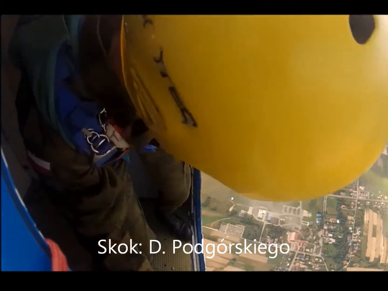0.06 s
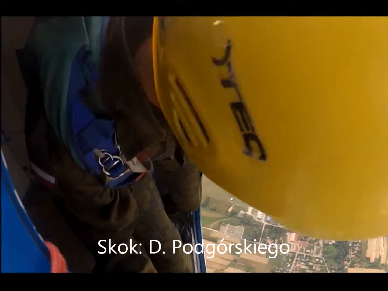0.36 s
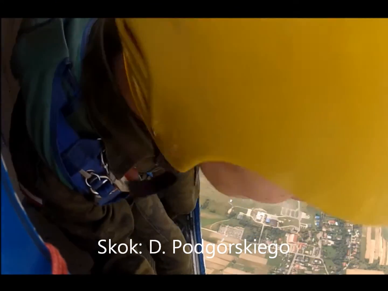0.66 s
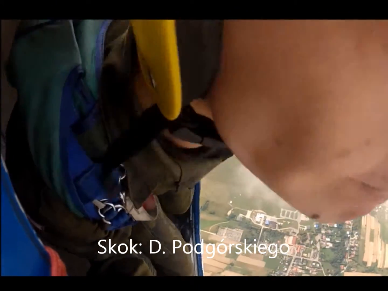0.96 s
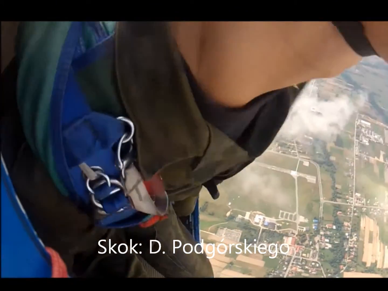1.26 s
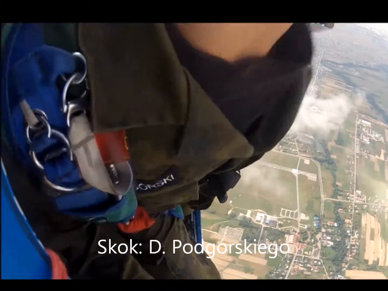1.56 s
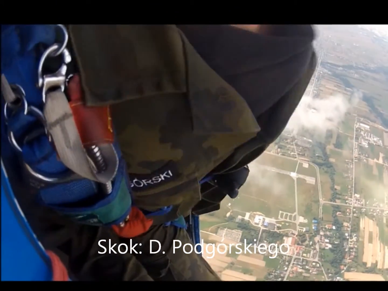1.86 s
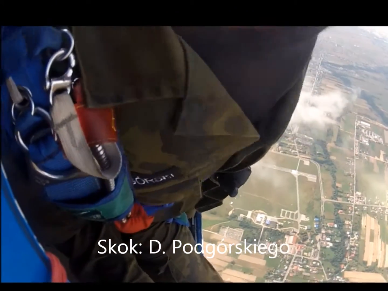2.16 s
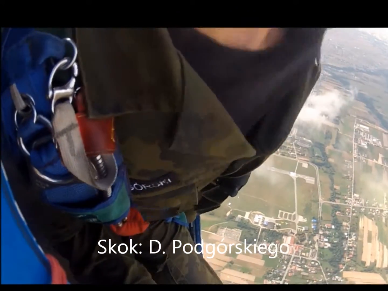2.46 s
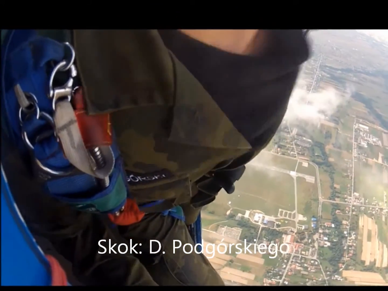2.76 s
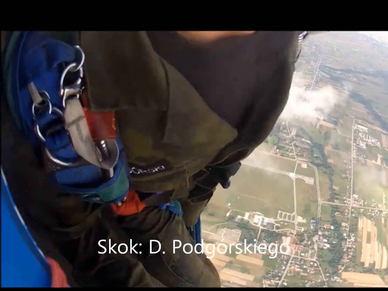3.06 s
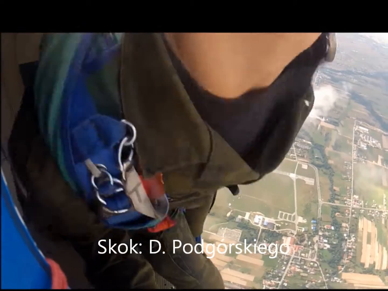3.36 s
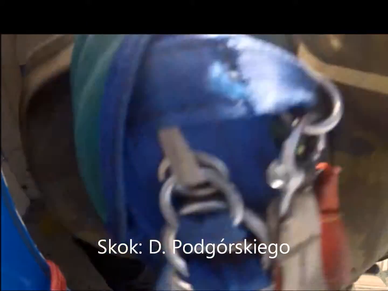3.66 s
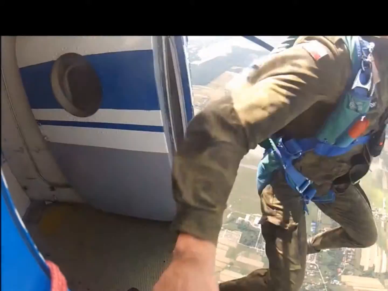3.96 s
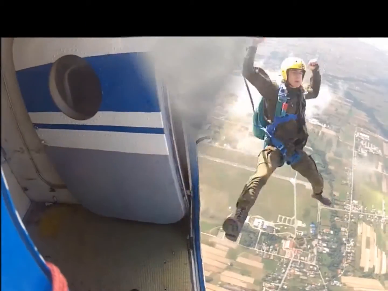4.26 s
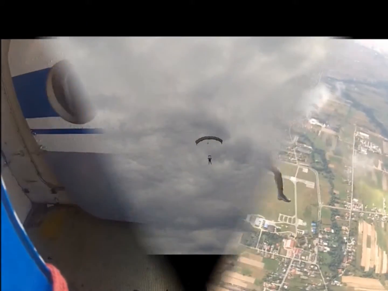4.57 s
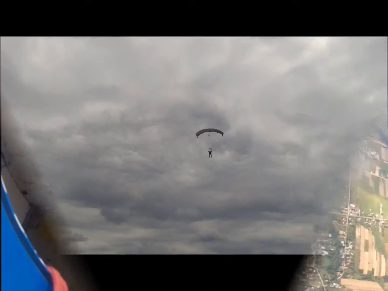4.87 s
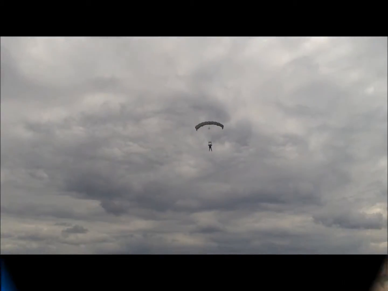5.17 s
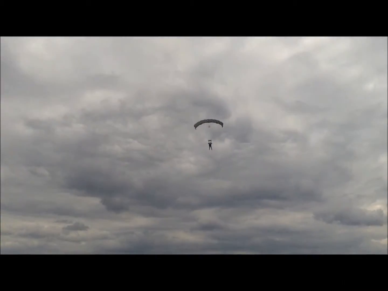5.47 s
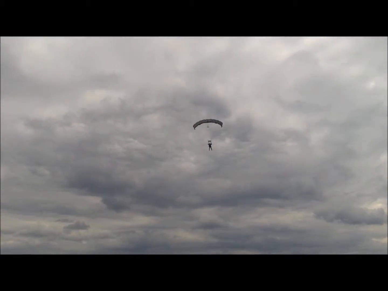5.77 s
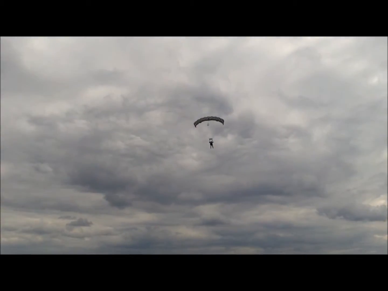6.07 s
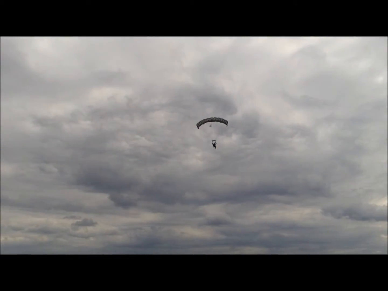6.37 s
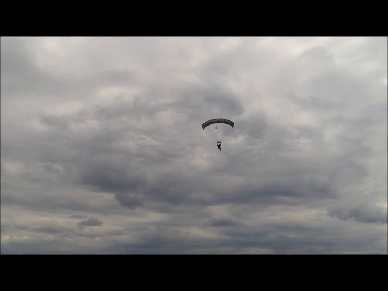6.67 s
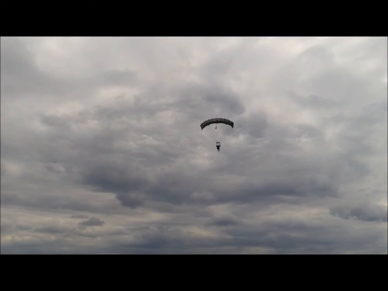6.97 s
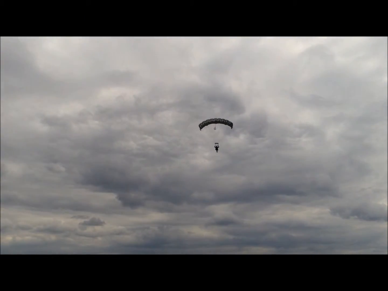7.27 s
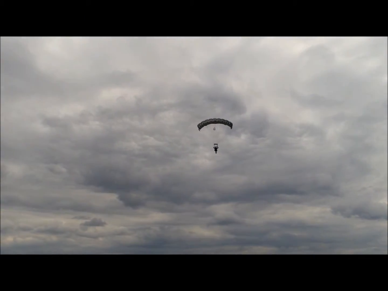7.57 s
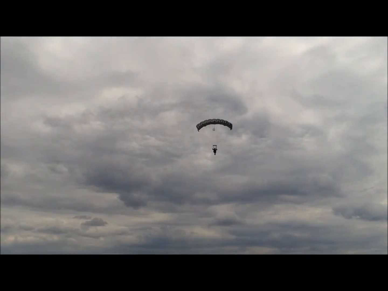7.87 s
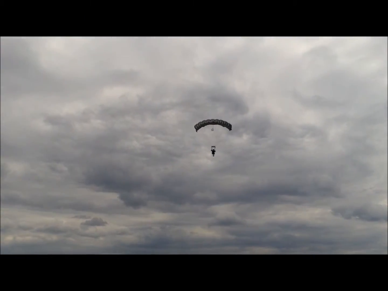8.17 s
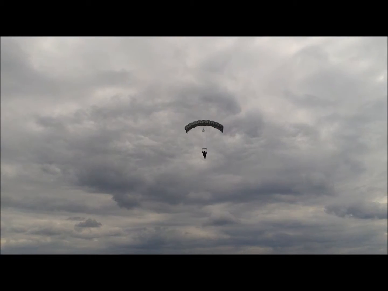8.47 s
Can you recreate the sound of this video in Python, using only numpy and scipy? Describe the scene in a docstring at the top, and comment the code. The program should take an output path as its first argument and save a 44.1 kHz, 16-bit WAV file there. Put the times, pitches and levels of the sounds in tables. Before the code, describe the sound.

Loud wind roars over a microphone at a plane's open door, then fades into a quiet field with a distant plane drone.

```python
"""From jump plane to quiet field

Slipstream roars over a camera microphone in the open door of a jump plane: eddies thump, rasp and fizz
on the housing, air swishes off the jumper's suit and the propeller throbs underneath.
The roar fades into a quiet field under a parachute, where the plane drones far off,
a breeze brushes the microphone and the plastic camera ticks a few times in the hand."""
import sys
import numpy as np
from scipy.fft import rfft, irfft, next_fast_len
from scipy.io import wavfile
from scipy.ndimage import map_coordinates

SR = 44100
rng = np.random.default_rng(int(sys.argv[2]) if len(sys.argv) > 2 else 0)


def generate_wav(signal):
    """Clip the signal to [-1, 1] and save it as 16-bit WAV at the path in sys.argv[1]."""
    frames = np.transpose(np.atleast_2d(signal))
    scaled = np.clip(frames, -1, 1) * 32767
    pcm = np.round(scaled).astype(np.int16)
    wavfile.write(sys.argv[1], SR, pcm)


N = 380132
TIME = np.arange(N) / SR
# the door's roar fades in a straight line of gain and is cut just short of silence
FADE_START_S, FADE_ZERO_S, CUT_S = 2.08, 5.374, 5.34

# partials of the far plane: f/Hz, level/dB
DRONE_PARTIALS = [(91, -45), (115.8, -54), (182, -59.5), (215, -61), (231, -64.5), (272.5, -62.5),
                  (330, -65.5), (347, -67.5), (363.7, -63.5), (379, -73), (429.7, -73.5), (454.7, -67),
                  (463, -68.5), (527.6, -80.5), (561, -71), (676, -74), (816.5, -76.5)]
# colour of the far rush of air: f/Hz, level/dB
FAR_AIR_SPECTRUM = [(100, 0), (330, 0.5), (410, -4.5), (580, 1.5), (800, -4), (960, -10), (1250, -4),
                    (1550, -12), (1800, -14.5), (2500, -21), (3300, -30), (4200, -56), (15000, -61)]
# swells of that rush: t/s, half width/s, relative level/dB
FAR_AIR_SWELLS = [(5.82, 0.42, -64), (6.68, .25, -67.5), (7.25, .25, -60.5), (7.49, .13, -57),
                  (7.8, .2, -64.5)]
# faint high rustles: t/s, half width/s, level/dB
RUSTLE_SWELLS = [(7.845, .015, -80), (8.25, .06, -79), (8.52, .11, -78)]
# colour of the rustles: f/Hz, level/dB
RUSTLE_SPECTRUM = [(3000, -2), (4500, -6), (7500, 2), (9500, -9), (11000, -23.5), (14000, -30.5)]
# puffs of breeze: t/s, half width/s, flutter level/dB, rumble level/dB
BREEZE_PUFFS = [(5.48, 0.041, -60, -45), (5.77, .07, -39, -36), (6.11, .05, -47, -49),
                (6.27, 0.031, -48, -41), (6.68, .04, -50, -41), (6.84, 0.027, -50, -58),
                (6.99, .03, -61.5, -44), (7.36, .1, -52, -49), (7.78, 0.064, -45, -47),
                (8.16, 0.14, -52, -41), (8.5, 0.12, -55, -43)]
# colours of the breeze's flutter and rumble on the microphone: f/Hz, level/dB
FLUTTER_SPECTRUM = [(40, -14.5), (135, 1.5), (190, -4.5), (260, -11), (400, -28), (900, -38.5), (2000, -82),
                    (5000, -120)]
RUMBLE_SPECTRUM = [(5, -3.5), (20, 0.5), (45, 3.5), (70, -3), (110, -18.5), (200, -36), (400, -58),
                   (1000, -75), (4000, -120)]
# ticks of the camera body: t/s, relative level/dB, ring f/Hz
CAMERA_TICKS = [(6.131, -32.5, 2630), (7.2667, -26.5, 3020), (7.3257, -27, 3140), (8.33, -35, 7150)]
# modes of the plastic case: f/Hz, level/dB, t60/s
CASE_MODES = [(4030, -8, 0.0027), (6200, -4, .0025), (8200, -5, 0.0019), (10800, -9, .002),
              (13500, -16, .002)]
# propeller and cabin tones: f/Hz, relative level/dB, pitch wander/Hz
PROPELLER_TONES = [(31.9, -4.5, 0.92), (63.2, -5, 0.87), (76.8, -5.5, 2.2), (344.5, -23, 0.99),
                   (667, -26.5, 3)]
# fader ride on the propeller, heard from the door: t/s, level/dB
THROB_LEVELS = [(0.0, -8.5), (0.52, -23.0), (0.6, -11.5), (0.76, -24.5), (1.0, -12.5), (1.56, -12.5),
                (1.68, -17), (2.08, -13), (2.48, -15.5), (2.64, -9), (2.8, -15.5), (2.92, -10),
                (4.04, -18.5), (4.36, -20), (4.52, -11.5), (5.0, -17)]
# the jumper leans out, then leaves: start t/s, end t/s, level/dB
SUIT_SWISHES = [(0.522, 1.09, -25.5), (3.522, 3.67, -24), (3.633, 3.883, -26.5)]
# colour of air glancing off the suit: f/Hz, level/dB
SUIT_SPECTRUM = [(1200, -33.5), (2200, -3.5), (2900, 7), (3900, -16.5), (5300, -8.5), (6100, -15),
                 (7000, -13), (10000, -14.5), (15000, -28.5)]
# sharp slaps of air: t/s, level/dB, ring f/Hz
AIR_SLAPS = [(.977, -9.5, 1780), (1.9332, -6.5, 1500), (1.9353, -4, 1380), (2.216, -7.5, 1350),
             (2.219, -3.5, 1307), (2.342, -7.5, 2320)]
# cavities of the camera housing: f/Hz, width/Hz, gain/dB
HOUSING_CAVITIES = [(705, 95, 9), (990, 80, 5), (1228, 170, 5), (1744, 180, 7.5), (2130, 200, -1.5),
                    (2400, 430, 4), (2830, 120, -3), (3110, 150, 5.5), (3650, 350, 4.5), (6654, 410, 2.5),
                    (8320, 240, 7), (8890, 200, 6), (9600, 300, 6), (10240, 290, 7), (13700, 240, 7.5),
                    (15100, 220, 5.5)]
# colours of the slipstream's low buffet, mid rush and top fizz: f/Hz, level/dB
BUFFET_SPECTRUM = [(8, -22.5), (18, -12.5), (27, 3.5), (45, -5.5), (75, 2.5), (105, 0), (220, -2),
                   (330, -5.5), (450, -11.5), (600, -20.5), (1000, -32), (3000, -81)]
RUSH_SPECTRUM = [(150, -44.5), (500, -7.5), (850, -6.5), (1150, -1), (1900, 0), (2600, -5.5), (3600, -9.5),
                 (4400, -16), (5300, -17), (6000, -28), (6600, -22), (8000, -28.5), (11000, -45)]
FIZZ_SPECTRUM = [(3000, -52.5), (6100, -24), (7000, -6.5), (7800, -5), (8500, -2), (10300, 0.5),
                 (10900, -1.5), (11300, -10), (12800, -7.5), (13400, -3), (14400, 1), (15300, -7)]
# the strongest gusts, and brief drawn-in dips, deepest where the camera's gain control
# ducks after a hard slap: t/s, half width/s, gain/dB
GUSTS_AND_DUCKS = [(.62, .04, 1.5), (.975, 0.0059, 2), (1.15, 0.026, 1.5), (1.48, 0.0074, 3.5),
                   (1.96, 0.027, -7), (2.2, 0.024, 0.5), (2.236, 0.016, -5), (3.765, .012, -2),
                   (4.26, 0.099, 1), (4.39, 0.015, -2)]


def amp(db):
    """Decibels to gain."""
    return np.exp(np.asarray(db) * np.log(10) / 20)


def unit(x):
    """Scaled to rms 1."""
    return x / np.sqrt(np.mean(x ** 2) + 1e-20)


def wobble(rate):
    """A smooth random curve, rate knots a second."""
    knots = rng.standard_normal(int(N * rate / SR) + 4)
    steps = np.arange(0, len(knots) - 1, 1 / 8)
    return np.interp(TIME * rate, steps, map_coordinates(knots, [steps]))


def humps(rows):
    """A sum of bell curves from rows of t/s, half width/s, height."""
    return sum(height * np.exp(-((TIME - s) / width) ** 2) for s, width, height in rows)


def swelling(rows, base_db):
    """Level in dB of a steady bed plus swells (t/s, half width/s, level/dB), added in power."""
    power = amp(base_db) ** 2 + humps((s, width, amp(db) ** 2) for s, width, db in rows)
    return 10 * np.log10(power)


def filtered(x, response):
    """Equalise x with a gain that is a function of frequency."""
    size = next_fast_len(N + SR // 2)
    hz = np.fft.rfftfreq(size, 1 / SR)
    return irfft(rfft(x, size) * response(hz), size)[..., :N]


def noise(spectrum, cavities=(), drive=1):
    """Noise of rms 1, swelling with drive, coloured by a spectrum and bell-shaped cavity resonances."""
    def colour(hz):
        points_hz, points_db = np.transpose(spectrum)
        contour_db = np.interp(np.log(hz + 1), np.log(points_hz), points_db)
        bells_db = sum(db * .5 ** ((2 * (hz - centre) / width) ** 2) for centre, width, db in cavities)
        return amp(contour_db + bells_db)
    return unit(filtered(drive * rng.standard_normal(N), colour))


def tone(hz, wander_hz, rate, flutter_db):
    """A sine of rms 1 whose pitch and level drift."""
    phase = 2 * np.pi * (np.cumsum(hz + wander_hz * wobble(rate)) / SR + rng.random())
    return unit(np.sin(phase) * amp(flutter_db * wobble(rate)))


def spread(source, side_db):
    """Mid/side stereo: one draw of the source in the centre, a second in opposite phase."""
    return source() + amp(side_db) * source() * np.array([[1], [-1]])


def far_plane():
    """A distant drone whose upper partials flutter more and swell with the far rush of air."""
    air_db = swelling(FAR_AIR_SWELLS, base_db=-72)
    swell_db = air_db - np.mean(air_db[TIME > CUT_S])
    waver_db = 2.5 * wobble(28)
    drone = 0
    for hz, db in DRONE_PARTIALS:
        height = min(hz / 600, 1)
        level = amp(db + height * (1.1 * swell_db + height * waver_db))
        drone += level * tone(hz, wander_hz=.004 * hz, rate=5, flutter_db=0.76 + 2.2 * height)
    eddies = amp(1.5 * wobble(40) + 2.0 * wobble(300))
    air = spread(lambda: noise(FAR_AIR_SPECTRUM, drive=eddies), side_db=-13)
    return drone + amp(air_db + 3.5) * air


def rustles():
    """Faint, uneven rustles rise out of a trace of hiss, very wide."""
    level = amp(swelling(RUSTLE_SWELLS, base_db=-101))
    return level * spread(lambda: noise(RUSTLE_SPECTRUM, drive=amp(2.5 * wobble(60))), side_db=3)


def breeze():
    """Soft puffs flutter and rumble, each microphone port catching its own air."""
    s, width, flutter_db, rumble_db = np.transpose(BREEZE_PUFFS)
    flutter_level = amp(swelling(zip(s, width, flutter_db), base_db=-58.5))
    rumble_level = amp(swelling(zip(s, width, rumble_db), base_db=-48))
    flutter = spread(lambda: noise(FLUTTER_SPECTRUM), side_db=-2.5)
    rumble = spread(lambda: noise(RUMBLE_SPECTRUM), side_db=-1.5)
    return flutter_level * flutter + rumble_level * rumble


def camera_ticks(ring_t60_s=0.0034, attack_s=0.00012, scuff_db=-34, scuff_t60_s=0.049):
    """Tiny plastic clicks: the struck spot and the case ring briefly, with a faint scuff as the tail."""
    out = np.zeros(N)
    t = np.arange(SR // 10) / SR
    attack = 1 - np.exp(-(t / attack_s) ** 2)
    grit = noise(spectrum=[(1000, -19), (3000, 3), (7000, 1), (12000, -14), (15000, -24)])

    def mode(hz, db, t60_s):
        return np.sin(2 * np.pi * (hz * t + rng.random())) * amp(db - 60 * t / t60_s)

    for s, db, hz in CAMERA_TICKS:
        start = round((s + 0.001) * SR)
        span = slice(start, start + len(t))
        ring = mode(hz, 0, ring_t60_s) + sum(mode(*row) for row in CASE_MODES)
        scuff = grit[span] * amp(scuff_db - 60 * t / scuff_t60_s)
        out[span] += amp(db + 2) * attack * (ring + scuff)
    # the case carries each click to the left port a moment later
    return np.array([np.roll(out, round(.00005 * SR)), out])


def propeller():
    """Blade beats and cabin boom, made unsteady by the air tearing past the door."""
    throb_db = np.interp(TIME, *np.transpose(THROB_LEVELS))
    tones = sum(amp(db) * tone(hz, wander_hz, rate=9, flutter_db=2.5)
                for hz, db, wander_hz in PROPELLER_TONES)
    return amp(throb_db) * tones


def suit_swishes():
    """The slipstream brightens while the jumper's suit moves through it."""
    strokes = 0
    for start, end, db in SUIT_SWISHES:
        progress = np.clip((TIME - start) / (end - start), 0, 1)
        strokes += amp(db) * np.sin(np.pi * progress)
    return strokes * noise(SUIT_SPECTRUM, HOUSING_CAVITIES, drive=amp(4 * wobble(160)))


def air_slaps(half_width_s=0.0012, spit_db=-17):
    """A hard eddy rings the housing for a few cycles and spits fizz."""
    out = np.zeros(N)
    spit = amp(spit_db) * noise(FIZZ_SPECTRUM, HOUSING_CAVITIES)
    for s, db, hz in AIR_SLAPS:
        near = np.abs(TIME - s) < 4 * half_width_s
        t = TIME[near] - s
        envelope = amp(db) * np.exp(-(t / half_width_s) ** 2)
        out[near] += envelope * (np.sin(2 * np.pi * hz * t) + spit[near])
    return out


def slipstream(buffet_db=-16, rush_db=-17, fizz_db=-28):
    """Eddies of all sizes hit the housing: each one thumps, rasps and fizzes at once."""
    ride_db = 0.5 * wobble(22) + humps(GUSTS_AND_DUCKS)
    eddies_db = 0.86 * wobble(45) + 1.8 * wobble(140) + 1.5 * wobble(700)
    force = amp(eddies_db)
    buffet = amp(buffet_db + 0.9 * wobble(20)) * noise(BUFFET_SPECTRUM, drive=amp(0.62 * eddies_db))
    rush = amp(rush_db) * noise(RUSH_SPECTRUM, HOUSING_CAVITIES, drive=force)
    crackle = amp(0.89 * wobble(2500))  # the smallest eddies bursting
    fizz = amp(fizz_db) * noise(FIZZ_SPECTRUM, HOUSING_CAVITIES, drive=force * crackle)
    return amp(ride_db) * (buffet + rush + fizz)


def scene():
    """The mono roar at the door fades away and uncovers the stereo field."""
    door = slipstream() + air_slaps() + suit_swishes() + propeller()
    field = far_plane() + breeze() + rustles() + camera_ticks()
    fade = np.interp(TIME, [FADE_START_S, FADE_ZERO_S], [1, 0])
    cut = np.clip((CUT_S - TIME) / 0.011, 0, 1)
    return fade * cut * door + field


def record(dry, top_hz=15330):
    """A soft clip rounds the loudest peaks, then a steep low-pass takes off the very top."""
    rounded = dry / (1 + np.abs(dry) ** 8) ** (1 / 8)
    return filtered(rounded, lambda hz: 1 / np.sqrt(1 + (hz / top_hz) ** 400))


dry = scene()
out = record(dry)
generate_wav(out)
```